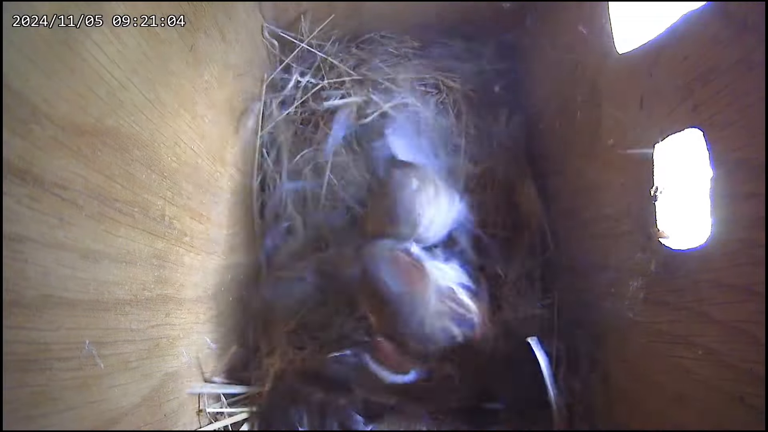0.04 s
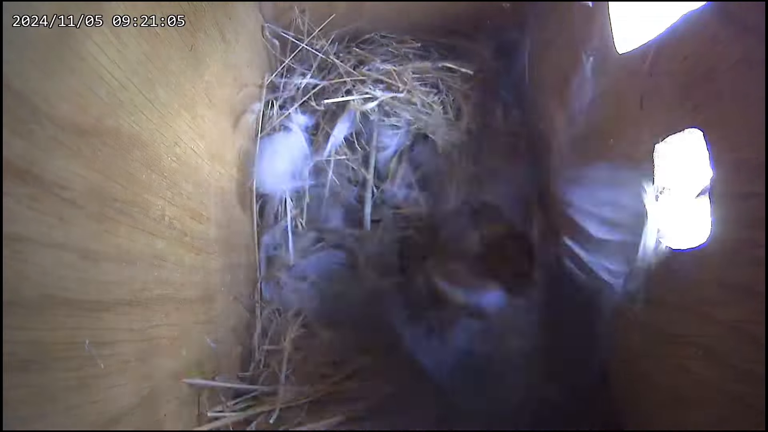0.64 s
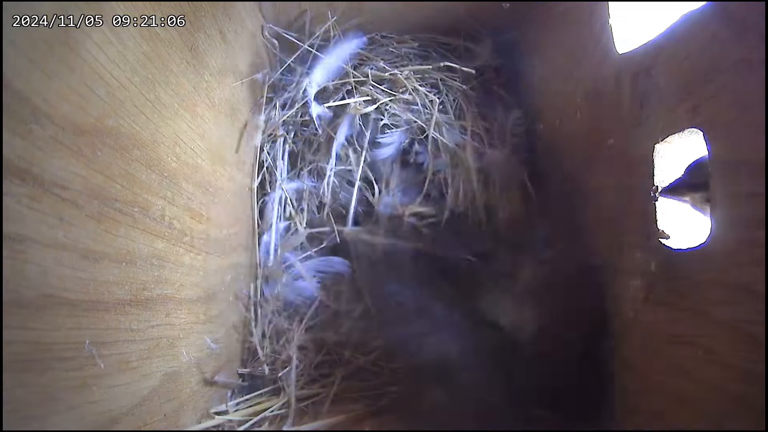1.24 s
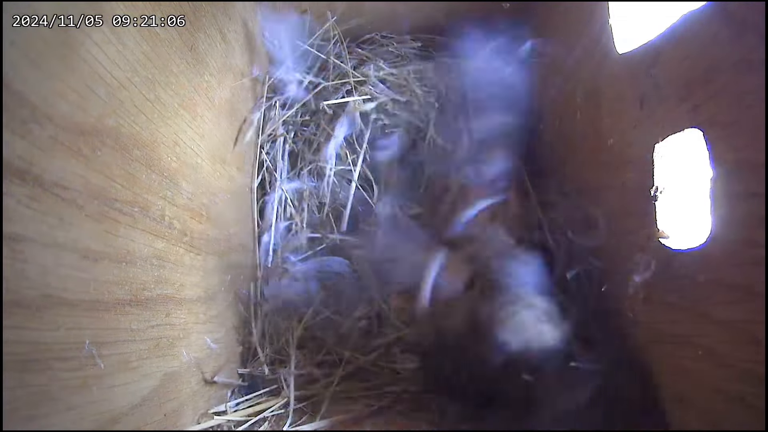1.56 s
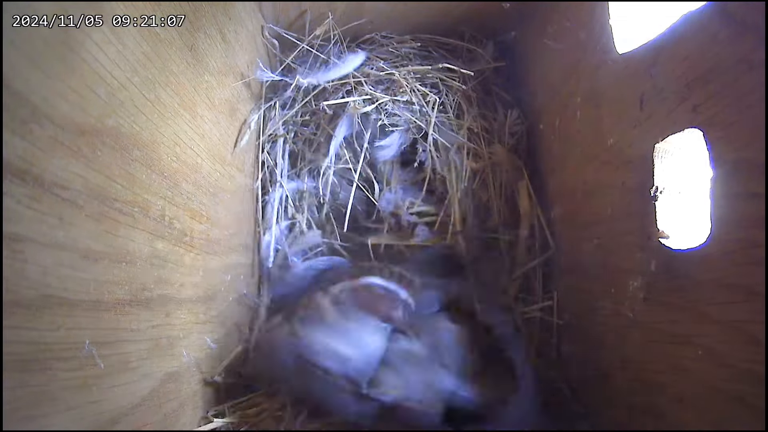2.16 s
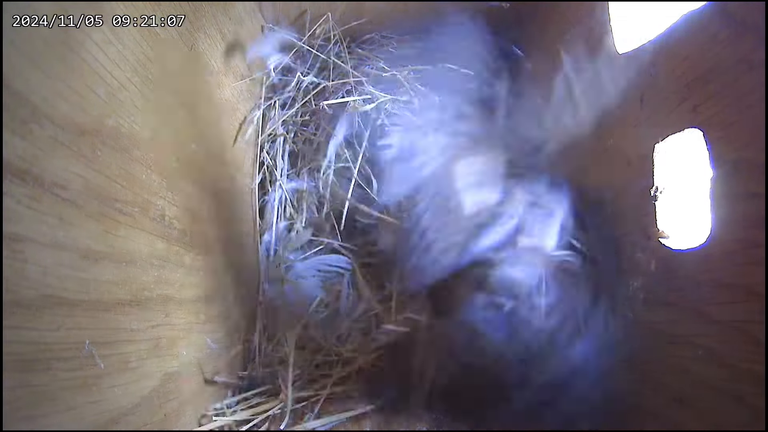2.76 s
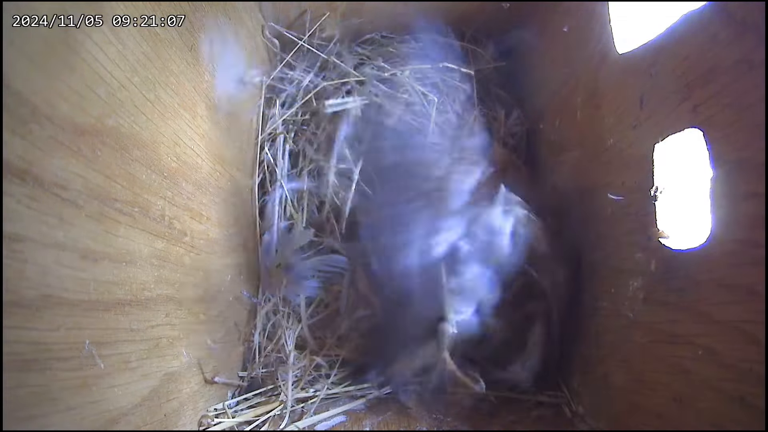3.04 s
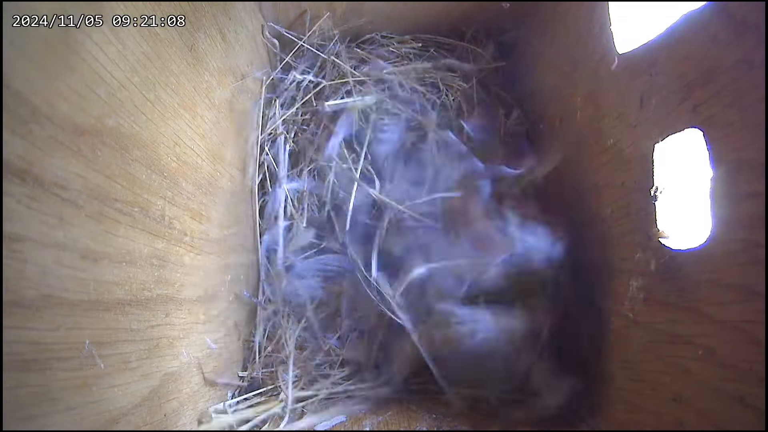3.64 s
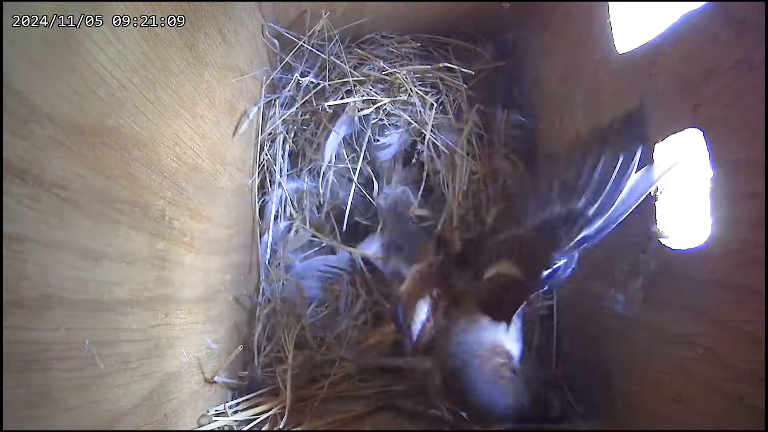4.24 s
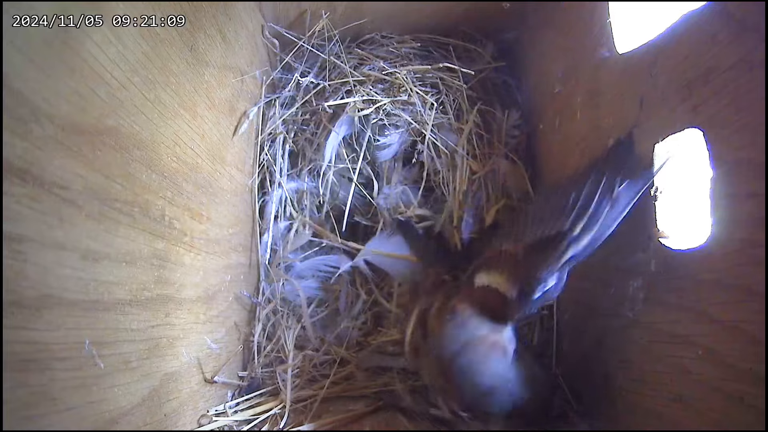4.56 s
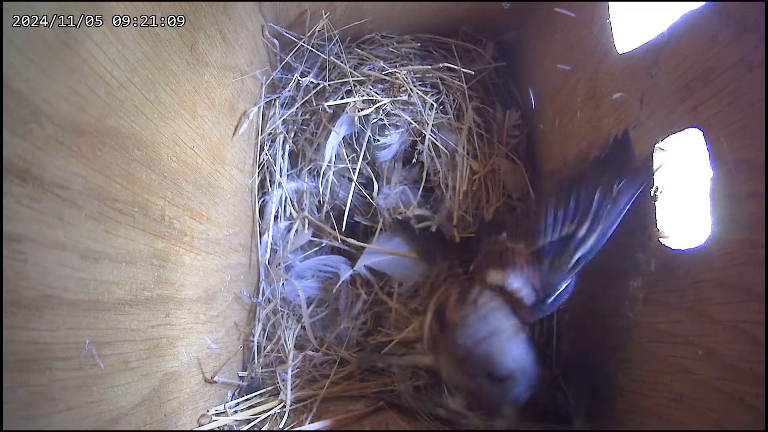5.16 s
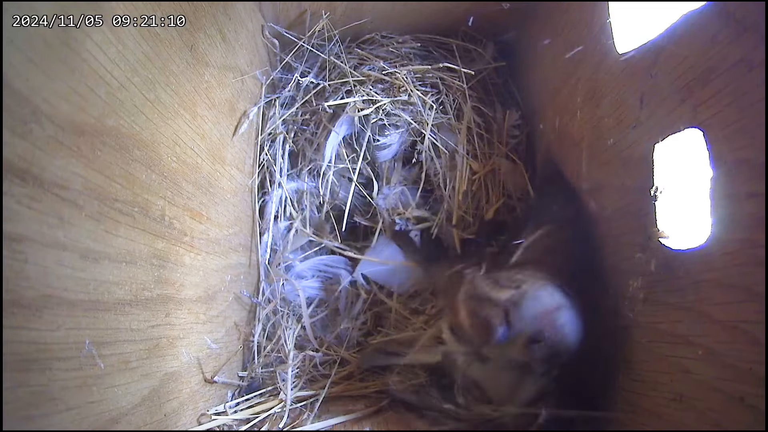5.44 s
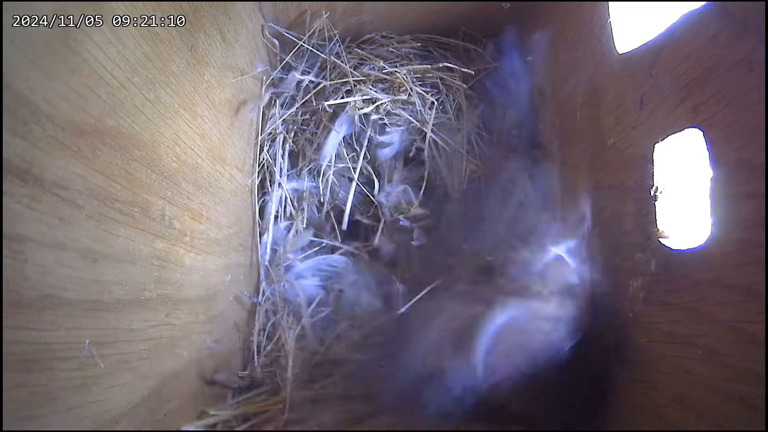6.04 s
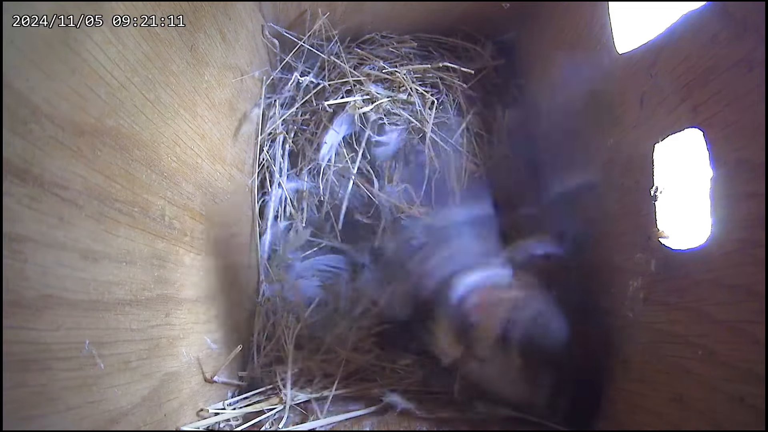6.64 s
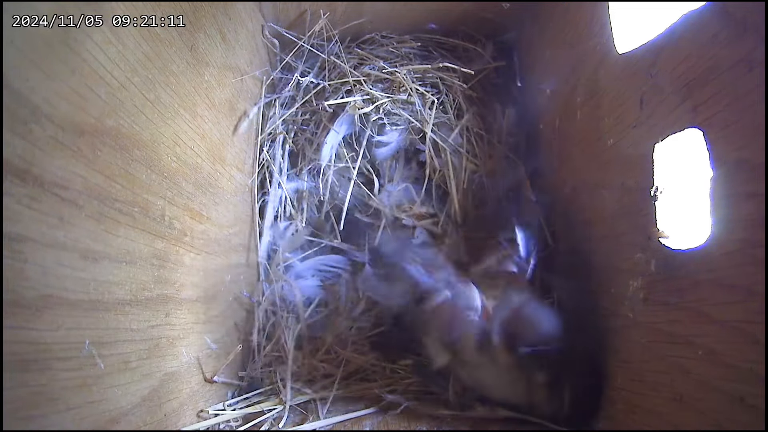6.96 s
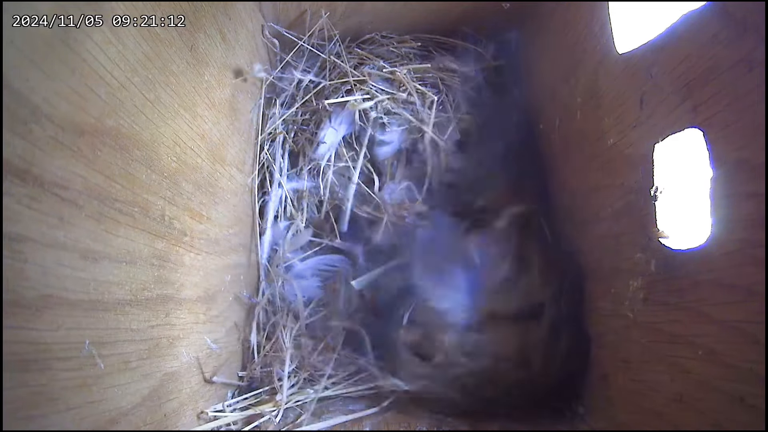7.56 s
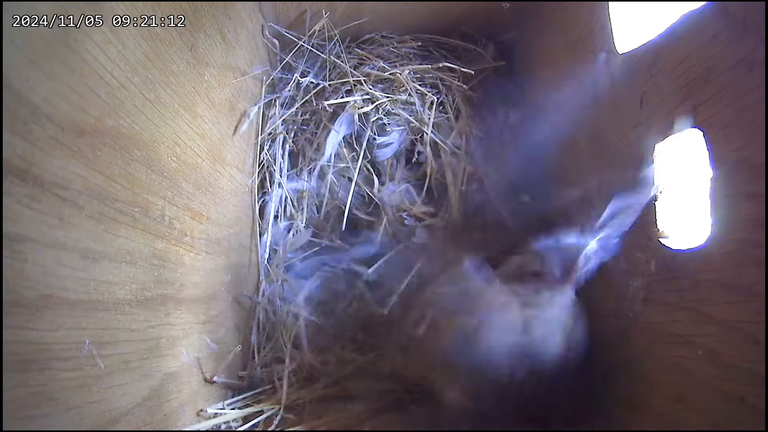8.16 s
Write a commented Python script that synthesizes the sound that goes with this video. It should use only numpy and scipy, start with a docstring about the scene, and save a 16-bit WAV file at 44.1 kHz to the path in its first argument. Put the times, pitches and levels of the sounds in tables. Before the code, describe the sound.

Two sparrows scuffle in a wooden nest box, very close to a small, dull-sounding microphone. Wings slap and flutter, bodies knock hollowly on the boards, claws scrape through straw and gusts of air boom. One bird gives a short raspy squeal. The fight drops to a lull with thin chirps, distant birds and soft outdoor noise, then the flapping and knocking break out again.

```python
"""Inside a wooden nest box, two sparrows fight a few centimetres from a small microphone.
Wings, feet and bodies hit the boards, push the air and stir the straw. One bird squeals; both then
lie locked for a while, with thin chirps and distant birds over the outdoor noise, and fight on.
The microphone has little treble and overloads on the hardest blows."""
import sys
import numpy as np
from scipy import signal
from scipy.fft import rfft, irfft
from scipy.io import wavfile

SR = 44100
rng = np.random.default_rng(int(sys.argv[2]) if len(sys.argv) > 2 else 0)


def pcm_store(signal):
    """Save signal as 16-bit PCM."""
    levels = np.round(np.clip(np.atleast_2d(signal), -1, 1) * 32767)
    wavfile.write(sys.argv[1], SR, levels.astype(np.int16).T)


N = 370881
TIME = np.arange(N) / SR

# microphone housing resonances under moving air: (frequency [Hz], width [Hz], gain [dB])
HOUSING_MODES = [(79.2, 15.3, 11), (127, 350, -34), (20.2, 30, -7.5)]


def from_db(db):
    return 10 ** (np.asarray(db) / 20)


def unit_rms(x):
    return x / np.sqrt(np.mean(x ** 2) + 1e-20)


def butter(x, hz, kind, order=2):
    return signal.sosfilt(signal.butter(order, hz, kind, fs=SR, output="sos"), x)


def wander(cutoff_hz, size):
    """Low-passed noise, rms 1."""
    return unit_rms(butter(rng.standard_normal(size + SR // 10), cutoff_hz, "low")[SR // 10:])


def add(track, time_s, sound):
    start = int(np.clip(round(time_s * SR), 0, N - 1))
    track[start:start + len(sound)] += sound[:N - start]


def resonate(x, modes):
    """Parallel two-pole resonators, alternating in sign."""
    out = 0
    for k, (hz, width_hz, db) in enumerate(modes):
        r = np.exp(-np.pi * width_hz / SR)
        poles = [1, -2 * r * np.cos(2 * np.pi * hz / SR), r * r]
        ring = (1 - r * r) / 2 * signal.lfilter([1, 0, -1], poles, x + 1e-18)
        out = out + (-1) ** k * from_db(db) * ring
    return out


def favour(modes, centre_hz, db_per_octave):
    """The way a wall is hit favours the modes near one pitch."""
    return [(hz, width_hz, db - db_per_octave * abs(np.log2(hz / centre_hz)))
            for hz, width_hz, db in modes]


def grains(size, per_s, spread_db):
    """Random tiny contacts of barbs and stalks, rms 1."""
    strength = from_db(spread_db * np.minimum(rng.exponential(1, size), 4))
    contacts = rng.random(size) < per_s / SR
    return unit_rms(contacts * strength * rng.choice([-1, 1], size))


def whistle(hz, rms_db):
    """Soft-ended sine along a pitch curve."""
    phase = 2 * np.pi * np.cumsum(hz) / SR
    return from_db(rms_db) * np.sqrt(2) * np.sin(phase) * signal.windows.tukey(len(hz), 0.1)


def outdoors(rms_db=-46.5):
    """Steady outside noise, coloured by the entrance hole and the box."""
    # (frequency [Hz], relative density [dB])
    spectrum = [(18, -48.5), (30, -7), (123, -13.5), (168, -12.5), (245, -19), (390, -9), (481, -19.5),
                (831, -15), (923, -29), (1210, -17), (1320, -7.5), (1590, -22), (2640, -32), (3260, -24.5),
                (4560, -61), (5930, -89), (10000, -120)]
    hz, db = np.transpose(spectrum)
    colour_db = np.interp(np.log(np.fft.rfftfreq(N, 1 / SR) + 1), np.log(hz), db)
    noise = irfft(rfft(rng.standard_normal(N)) * from_db(colour_db), N)
    return from_db(rms_db) * unit_rms(noise)


def far_birds(fall=0.104, length_s=0.0895, blur_hz=55, gain_db=-2):
    """Short falling notes, blurred by distance."""
    # (time [s], starting pitch [Hz], relative level [dB])
    notes = [(4.08, 1430, -40), (4.256, 1240, -44), (4.393, 1480, -41), (4.69, 1200, -49),
             (4.839, 1450, -55), (4.96, 1620, -46), (5.048, 1210, -40.5), (5.118, 1650, -43),
             (5.36, 1387, -41), (5.471, 1200, -43), (5.6, 1420, -45)]
    out, t = np.zeros(N), TIME[:int(length_s * SR)]
    for time_s, start_hz, db in notes:
        hz = start_hz * (1 - fall * t / length_s) + blur_hz * wander(220, len(t))
        add(out, time_s, whistle(hz, db + gain_db) * np.sin(np.pi * t / length_s))
    return out


def chirp(length_s, top_hz, db, crest, drop_hz, ends_db, waver_hz=25, flutter_db=1.5, hoarse=0.2):
    """Slightly hoarse whistle; pitch and level arch to a top at crest (0-1)."""
    size = int(length_s * SR)
    sag = (TIME[:size] / length_s - crest) ** 2
    sag /= sag.max()
    hz = top_hz - drop_hz * sag + waver_hz * wander(250, size)
    level_db = db + ends_db * sag + flutter_db * wander(60, size)
    return whistle(hz, level_db) * (1 + hoarse * wander(300, size))


def chirps(count=5, first_s=4.275, period_s=0.318):
    """One bird repeats a thin call; short peeps cut in."""
    # (time [s], length [s], top pitch [Hz], level [dB])
    peeps = [(4.263, 0.08, 2300, -57), (4.669, 0.06, 2500, -47.5), (4.672, 0.042, 3440, -54),
             (4.889, 0.034, 3070, -40.5), (4.915, 0.035, 3530, -47), (4.923, .036, 2920, -42),
             (4.918, 0.04, 4640, -55)]
    out = np.zeros(N)
    for k in range(count):
        thin_call = chirp(length_s=0.19, top_hz=3080, db=-54.5, crest=0.38, drop_hz=333, ends_db=-9)
        add(out, first_s + k * period_s, thin_call)
    for time_s, length_s, top_hz, db in peeps:
        add(out, time_s, chirp(length_s, top_hz, db, crest=0.49, drop_hz=198, ends_db=-7))
    return out


def squeal(rest_hz=2815, full_rasp_hz=3760, buzz_hz=165, swing_hz=240, rasp_hz=330, throb=0.45,
           second_hz=3050, second_db=-8, hiss_db=-4, slack_db=-9):
    """One side of the syrinx whistles, shaken by a buzz; strain adds pitch, rasp and the other side."""
    # (time [s], length [s], point of most strain [0-1], pitch there [Hz], relative level [dB])
    syllables = [(3.326, 0.05, 0.86, 2970, -30.5), (3.357, 0.018, 0.3, 3900, -24.5),
                 (3.379, 0.012, 0.7, 3105, -17), (3.387, .011, 0.8, 3780, -16.5),
                 (3.404, .02, .7, 3380, -27.5), (3.423, 0.0443, .62, 3960, -20.5),
                 (3.467, 0.013, 0.4, 2980, -18.5), (3.486, .014, .5, 2950, -26)]
    out = np.zeros(N)
    for time_s, length_s, crest, top_hz, db in syllables:
        size = int(length_s * SR)
        strain = np.sin(np.pi / 2 * np.interp(TIME[:size] / length_s, [0, crest, 1], [0, 1, 0]))
        hz = rest_hz + (top_hz - rest_hz) * strain
        rough = np.interp(hz, [rest_hz, full_rasp_hz], [0.1, 0.88])
        buzz = np.sin(2 * np.pi * np.cumsum(buzz_hz * (1 + 0.099 * wander(60, size))) / SR)
        first_side = whistle(hz + rough * (swing_hz * buzz + rasp_hz * wander(930, size)), db)
        second_side = rough * whistle(second_hz + rasp_hz * wander(850, size), db + second_db)
        noise = unit_rms(butter(rng.standard_normal(size), [2700, 4400], "band", order=1))
        hiss = rough * from_db(db + hiss_db) * noise
        envelope = (1 + throb * buzz) * from_db(slack_db * (1.5 - strain))
        add(out, time_s, (first_side + second_side + hiss) * envelope)
    return out


def wall_echoes(x, t60_s=0.058, wet_db=-8):
    """Close walls add a dense, very short tail."""
    t = TIME[:SR // 10]
    tail = rng.standard_normal(len(t)) * from_db(-60 * t / t60_s)
    return x + from_db(wet_db) * signal.fftconvolve(x, tail / np.linalg.norm(tail))[:N]


def struggle_db(t, still_db=(-55, -71, -62.5), fade_s=0.039):
    """Scraping, stirred-air and straw curves; between bouts they sink to the nest's faint creeping."""
    # one curve per bout, relative levels: (time [s], scraping [dB], stirred air [dB], straw [dB])
    bouts = [
        [(0.0, -16.5, -13, -32), (0.458, -23.5, -29.5, -33), (0.618, -18.5, -20.5, -31.5),
         (0.738, -11.5, -17, -25), (0.818, -11, -14, -26.5), (0.926, -22, -26, -34), (1.3, -31.5, -34.5, -38)],
        [(1.33, -27, -37, -39), (1.428, -29.5, -35, -41.5), (1.616, -27, -37, -35.5),
         (1.796, -35.5, -43.5, -45), (1.938, -33.5, -44.5, -42), (2.1, -27, -37.5, -37),
         (2.25, -36, -47.5, -44)],
        [(2.28, -25, -46, -31.5), (2.336, -22.5, -31.5, -35), (2.474, -25.5, -19.5, -40),
         (2.674, -29.5, -33.5, -44.5), (2.868, -23.5, -27.5, -41.5), (3.06, -43, -45, -53.5),
         (3.12, -44, -55, -50)],
        [(3.45, -32, -48, -44), (3.516, -30, -27, -32.5), (3.604, -23, -44, -41), (3.668, -26, -28.5, -30.5),
         (4.036, -40, -43.5, -54), (4.154, -44.5, -50, -56), (4.25, -64, -45, -74)],
        [(4.48, -43, -66, -54), (4.638, -41.5, -73, -63), (5.016, -42.5, -76, -52), (5.118, -44.5, -65, -49.5),
         (5.3, -36.5, -67, -45), (5.452, -51, -73, -56.5), (5.6, -61, -74, -51)],
        [(5.68, -45.5, -64, -48), (5.804, -30, -34.5, -43), (5.968, -38, -23.5, -47), (6.064, -22.5, -28, -38),
         (6.266, -34.5, -38, -45.5), (6.396, -27, -22, -43), (6.62, -40.5, -43.5, -49.5)],
        [(7.17, -34, -56, -50), (7.356, -25, -26.5, -41.5), (7.662, -33, -38, -38.5), (7.932, -32, -44, -44),
         (8.122, -27, -32, -39), (8.25, -20.5, -23.5, -39), (8.41, -30, -28.5, -38)],
    ]
    gains = from_db(still_db)[:, None]
    for bout in bouts:
        times_s, *columns_db = np.transpose(bout)
        levels_db = [np.interp(t, times_s, column) for column in columns_db]
        outside_s = np.maximum(np.maximum(times_s[0] - t, t - times_s[-1]), 0)
        fade = np.exp(-np.minimum(outside_s / fade_s, 20))
        gains = np.maximum(gains, from_db(levels_db) * fade)
    return 20 * np.log10(gains)


def draught(stirred_db, gain_db=3):
    """Low rumble of air stirred by the wings."""
    rumble = butter(resonate(rng.standard_normal(N), HOUSING_MODES), 490, "low")
    return from_db(stirred_db + gain_db) * unit_rms(rumble)


def puffs(push_s=0.0014, eddy_gain=0.94, eddy_s=0.018):
    """A wing's push of air and its eddies set the microphone housing booming."""
    # (time [s], peak [dB])
    strokes = [(0.079, 4.5), (0.133, -4), (0.368, -5.5), (0.574, 0.5), (0.643, 1.5), (0.821, 1.2),
               (0.843, -3.2), (0.997, -8), (1.204, -6.5), (1.376, -14), (2.591, -10.5), (2.641, -19),
               (2.729, -11), (3.579, -9), (3.767, -12.5), (5.137, -26.5), (5.921, -15.5), (6.113, 4),
               (6.176, 1.5), (6.234, -2.5), (6.303, -16), (6.384, -21.5), (6.45, -11), (7.213, -6),
               (7.288, -10), (8.073, -2.5), (8.284, -3)]
    out, t = np.zeros(N), TIME[:SR // 4]
    push = t / push_s * np.exp(1 - t / push_s)
    for time_s, peak_db in strokes:
        eddies = eddy_gain * wander(190, len(t)) * np.exp(-t / eddy_s)
        boom = resonate(-(push + eddies), HOUSING_MODES)
        add(out, time_s, from_db(peak_db) * boom / np.abs(boom).max())
    return out


def feather_drags(band_hz=(3100, 4600), clump_db=3):
    """Feathers drag through straw; barbs catch on stalks in scratchy swells."""
    # (time [s], length [s], level [dB])
    drags = [(3.856, 0.14, -50), (5.064, 0.36, -50.5), (5.481, 0.096, -45.5), (5.66, 0.1, -43),
             (7.917, 0.11, -38.5)]
    out = np.zeros(N)
    for time_s, length_s, db in drags:
        size = int(length_s * SR)
        catches = grains(size, per_s=1200, spread_db=1.0) * from_db(clump_db * wander(70, size))
        scratch = unit_rms(butter(catches, band_hz, "band"))
        add(out, time_s, from_db(db) * scratch * signal.windows.tukey(size, 0.6))
    return out


def nest_box(force, spot_hz, focus_db_per_octave, top_hz, hollow_hz):
    """A force sounds three ways: hollow air modes, ringing boards, bright contact swish."""
    # resonances: (frequency [Hz], width [Hz], gain [dB])
    air_modes = [(205.5, 15.5, -4.5), (326.5, 88.7, -3), (391.4, 35.7, 1.5), (464, 34.5, -4.5),
                 (400, 640, -13.5)]
    board_modes = [(735.3, 107, 7.5), (827, 108, 9.5), (999.4, 57, 9.5), (960, 9.1, -13.5),
                   (1283.5, 68, 10), (1378, 240, 5), (1496, 103, 11), (1774, 100, 0.5), (1985, 37, -1),
                   (1179, 995, -0.5)]
    feather_modes = [(2248, 893, 2), (3113, 258, 2.5), (3444, 217, -1), (3840, 1400, -43)]
    air = resonate(force, favour(air_modes, hollow_hz, db_per_octave=7))
    air = butter(butter(air, 830, "low"), 0.34 * hollow_hz, "high", order=4)
    boards = resonate(force, favour(board_modes, spot_hz, focus_db_per_octave))
    boards = butter(butter(boards, top_hz, "low", order=4), 310, "high")
    swish = butter(resonate(force, feather_modes), 2040, "high", order=4)
    return air, boards, swish


def scuffle(scraping_db, straw_db, clump_db=4.5, air_db=-2, boards_db=-3, air_slope=1.16, pivot_db=-30):
    """Claws and straw scrape in clumps of tiny clicks; a harder struggle sounds more hollow."""
    force = grains(N, per_s=2700, spread_db=4.0) * from_db(clump_db * wander(25, N))
    parts = nest_box(force, spot_hz=1050, focus_db_per_octave=8, top_hz=2080, hollow_hz=325)
    hollow_db = pivot_db + air_slope * (scraping_db - pivot_db)
    levels_db = (hollow_db + air_db, scraping_db + boards_db, straw_db)
    return sum(from_db(db) * unit_rms(part) for db, part in zip(levels_db, parts))


def blow(swell_s, levels_db, spot_hz, bare, graze_s=0.033, graze_db=-21, brush_s=0.027, brush_db=-22):
    """Feathers graze the wall, slap, brush off. levels_db: air, boards, swish energy as 20 ms rms."""
    lead = rms_span = SR // 50
    t = TIME[:SR // 7] - lead / SR
    age = np.maximum(t, 0) / swell_s
    slap = age * np.exp(1 - 1.147 * age)
    graze = from_db(graze_db) * np.exp(-abs(t) / graze_s)
    brush = from_db(brush_db) * np.exp(-abs(t) / brush_s)
    force = (slap + np.where(t < 0, graze, brush)) * grains(len(t), per_s=7000, spread_db=1.5)
    # barer contact (0-1): fewer grains around one clean impulse, clearer pitch
    force *= from_db(-11 * bare)
    force[lead + SR // 1000] += 7.0
    top_hz = 2100 * (1 - bare) + 1.19 * spot_hz * bare
    focus_db_per_octave = 7 + 19 * bare
    hollow_hz = np.interp(levels_db[0], [-24, -12, -3], [440, 345, 215])  # heavier is deeper
    parts = nest_box(force, spot_hz, focus_db_per_octave, top_hz, hollow_hz)
    return sum(from_db(db) * part / np.sqrt(np.sum(part ** 2) / rms_span)
               for db, part in zip(levels_db, parts))


def land(blows):
    """Mix (time [s], sound) blows, each 20 ms graze ahead of its time."""
    out = np.zeros(N + SR)
    for time_s, sound in blows:
        start = max(int(time_s * SR) - SR // 600, 0)
        out[start:start + len(sound)] += sound
    return out[SR // 50:][:N]


def touches(per_s=11, spread_db=2, swell_s=0.0045, air_db=1.0, boards_db=-6.5, swish_db=-12):
    """Wing tips and feet touch the walls at a loose pace, as hard as the birds struggle."""
    count = int(N / SR * per_s)
    time_jitter, level_jitter = rng.standard_normal((count, 2)).T
    times_s = np.clip((np.arange(count) + 0.3 * time_jitter) / per_s, 0, N / SR)
    strengths_db = struggle_db(times_s)[0] + spread_db * level_jitter
    balance_db = np.array([air_db, boards_db, swish_db])
    return land((time_s, blow(swell_s, db + balance_db, spot_hz=1050, bare=0.12))
                for time_s, db in zip(times_s, strengths_db))


def knocks(swish_db=-19, bare=0.62):
    """Beaks, feet and bodies ring one spot of bare wood, with little swish."""
    # (time [s], swell scale [s], box air [dB], boards [dB], spot pitch [Hz])
    hits = [(0.383, 0.005, -12, -11, 865), (0.644, 0.02, -9, -13.5, 1150),
            (0.681, 0.0035, -8.5, -7.5, 1260), (0.695, .0036, -7.5, -8.5, 830),
            (0.714, 0.0048, -8.5, -12.5, 810), (0.871, 0.0026, -15, -22, 890),
            (1.185, 0.008, -17.5, -13.5, 1190), (1.213, 0.0092, -15.5, -18.5, 850),
            (1.54, 0.01, -37, -17, 1014), (1.648, 0.004, -30, -24.5, 950), (2.403, 0.0026, -11, -27, 1040),
            (2.425, 0.0028, -1.5, -6, 1230), (2.44, .0024, -8.5, -14.5, 1070),
            (2.551, 0.0038, -30, -19.5, 880), (2.716, .004, -19, -29, 865),
            (2.781, 0.0055, -16.5, -24, 950), (3.509, 0.0071, -16.5, -14.5, 1080),
            (3.573, 0.0025, -1.5, -7, 1100), (4.463, 0.0069, -23.5, -30, 1090),
            (4.625, 0.0036, -42, -40.5, 1040), (4.83, 0.0037, -33.5, -40, 1120),
            (5.735, .005, -56, -32, 795), (5.807, 0.0022, -21, -31.5, 1020),
            (5.989, 0.006, -10.5, -16.5, 1120), (6.219, 0.0051, -22, -16, 1030),
            (6.848, 0.0017, -22, -19, 1350), (7.205, 0.011, -17, -38, 1260),
            (7.262, 0.0045, -16.5, -22, 850), (7.631, 0.0038, -18.5, -19.5, 810),
            (8.124, 0.0029, -15, -13, 995), (8.325, 0.0049, -15.5, -27, 860)]
    return land((time_s, blow(swell_s, (air_db, boards_db, boards_db + swish_db), spot_hz, bare))
                for time_s, swell_s, air_db, boards_db, spot_hz in hits)


def wing_slaps(bare=0.045):
    """Feathered blows sound the whole wall and swish."""
    # (time [s], swell scale [s], box air [dB], boards [dB], swish [dB], spot pitch [Hz])
    slaps = [(0.002, 0.0021, -13.5, -23, -37.5, 930), (0.024, 0.0026, -15, -14.5, -17.5, 1200),
             (0.08, 0.033, -6, -31, -39, 900), (0.137, 0.0071, -5, -12.5, -24, 760),
             (0.162, 0.0057, -29, -16, -24.5, 1250), (0.21, 0.0084, -10.5, -19.5, -26.5, 900),
             (0.244, 0.0035, -12, -22, -28, 1210), (0.32, 0.0012, -14.5, -14.5, -23, 1030),
             (0.368, 0.0031, -7, -10.5, -19, 1540), (0.481, 0.008, -18.5, -30, -33, 860),
             (0.576, 0.0039, -12.5, -31, -38, 930), (0.588, 0.0037, -9.5, -14, -22, 960),
             (0.63, .005, -11, -12, -20.5, 820), (0.728, .006, -7, -15.5, -22.5, 930),
             (0.768, 0.0086, -16, -12.5, -18.5, 1140), (0.791, 0.0029, -13.5, -16, -19, 1020),
             (0.823, 0.0055, -11, -17.5, -22, 1030), (0.849, 0.0015, -11, -16, -27, 990),
             (0.998, 0.0095, -22, -23.5, -31, 1000), (1.047, 0.0032, -30, -21.5, -31.5, 1215),
             (1.118, 0.0023, -24, -15, -28.5, 1400), (1.171, 0.0035, -4, -14.5, -21, 1230),
             (1.382, 0.0052, -15.5, -20, -30.5, 1050), (1.415, 0.0033, -21.5, -25.5, -27.5, 1280),
             (1.487, 0.01, -19, -27, -30, 1160), (1.735, 0.0099, -23.5, -24, -29.5, 1070),
             (1.813, 0.0017, -15, -18, -21.5, 1280), (1.886, 0.0031, -30, -34.5, -34, 1410),
             (2.043, 0.012, -24.5, -27, -35, 960), (2.075, 0.0035, -30, -28, -38, 1160),
             (2.281, 0.003, -15.5, -16, -27, 1420), (2.358, 0.011, -17, -18, -28, 1080),
             (2.488, 0.0018, -17.5, -18.5, -31, 1100), (2.598, 0.012, -22, -21, -29.5, 1300),
             (2.692, 0.0011, -14, -23.5, -33.5, 775), (2.752, .004, -14.5, -24.5, -29, 930),
             (2.801, 0.0044, -17.5, -21.5, -24.5, 1190), (2.858, 0.0018, -25, -22, -28, 970),
             (2.922, 0.0022, -20, -22, -29, 1050), (2.988, 0.0027, -27, -27.5, -32, 1300),
             (3.067, 0.0032, -31, -27.5, -33, 1420), (3.55, .012, -11.5, -15.5, -25.5, 940),
             (3.646, 0.0055, -21.5, -23.5, -27, 900), (3.699, 0.0026, -24, -26.5, -34, 890),
             (3.776, 0.0028, -25, -19, -23.5, 1580), (3.795, 0.0072, -32, -36, -28, 1410),
             (4.032, 0.0046, -34, -30, -39.5, 1050), (4.449, 0.0065, -44, -29, -49, 1050),
             (4.728, 0.0069, -35, -39, -59, 1120), (4.904, 0.0073, -43, -36.5, -43, 935),
             (5.136, 0.011, -46, -34.5, -44, 1280), (5.307, 0.0035, -50, -31.5, -54, 875),
             (5.48, 0.0066, -37, -37.5, -49, 1280), (5.695, 0.0043, -37, -30.5, -40, 804),
             (5.863, .004, -15, -16.5, -28.5, 1180), (5.92, 0.0046, -11.5, -13, -24, 1090),
             (6.055, .004, -20.5, -21.5, -43.5, 1230), (6.108, 0.017, -12.5, -16.5, -29.5, 900),
             (6.182, 0.0068, -14, -27, -30.5, 870), (6.242, 0.0012, -17, -26, -34.5, 1280),
             (6.393, 0.0041, -42, -30, -36.5, 1500), (6.41, 0.0068, -40, -26, -38, 875),
             (6.466, 0.0032, -25, -33, -29.5, 1290), (6.547, .002, -45, -38.5, -45, 1730),
             (6.857, 0.0046, -34, -25, -35, 1250), (6.957, 0.0054, -51.5, -42, -50, 1200),
             (7.172, .005, -16, -19, -27.5, 1420), (7.23, 0.0037, -13, -13, -24, 1390),
             (7.285, 0.0036, -10.5, -15, -25.5, 1210), (7.343, 0.0026, -13.5, -26, -20, 1210),
             (7.404, 0.0022, -15, -20.5, -33.5, 1310), (7.466, 0.003, -21.5, -30.5, -32, 1000),
             (7.558, 0.0025, -21.5, -32, -46, 1180), (7.594, .002, -23.5, -26, -39, 880),
             (7.685, 0.0019, -20, -23.5, -32.5, 930), (7.8, .007, -29, -24, -32, 870),
             (7.962, 0.0068, -24, -27.5, -33.5, 905), (7.989, 0.013, -19, -23.5, -31, 880),
             (8.076, 0.0038, -15.5, -20.5, -29.5, 880), (8.154, 0.0036, -21, -29, -38, 950),
             (8.174, 0.0055, -31, -27, -36, 840), (8.228, 0.005, -13.5, -18.5, -27, 1070),
             (8.296, 0.0023, -16.5, -25.5, -30, 900), (8.344, 0.0028, -29, -13.5, -25, 1290)]
    return land((time_s, blow(swell_s, levels_db, spot_hz, bare))
                for time_s, swell_s, *levels_db, spot_hz in slaps)


def scene():
    """Fight, calls and background, mono."""
    scraping_db, stirred_db, straw_db = struggle_db(TIME)
    fight = wing_slaps() + knocks() + puffs() + draught(stirred_db)
    nest = scuffle(scraping_db, straw_db) + feather_drags()
    calls = wall_echoes(squeal() + chirps())
    background = far_birds() + outdoors()
    return (fight + nest + calls + background + touches())[None]


def record(dry, band_hz=4300, dc_offset=-0.021, ceiling=0.9, knee=81.0, treble_db=-8.0):
    """Narrow-band microphone into an input that sits slightly off zero and flattens peaks."""
    narrow = butter(butter(dry, band_hz, "low", order=8), 4940, "low", order=16) + dc_offset
    clipped = narrow / (1 + np.abs(narrow / ceiling) ** (2 * knee)) ** (0.5 / knee)
    in_band = butter(clipped, 4170, "low", order=6)
    overload_treble = from_db(treble_db) * butter(clipped, 4800, "high", order=4)
    return butter(in_band + overload_treble, 16000, "low", order=16)


dry = scene()
out = record(dry)
pcm_store(out)
```